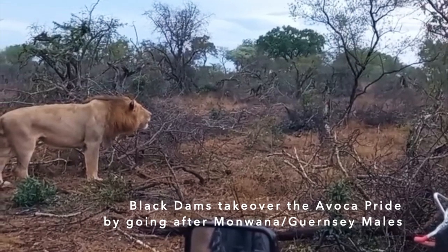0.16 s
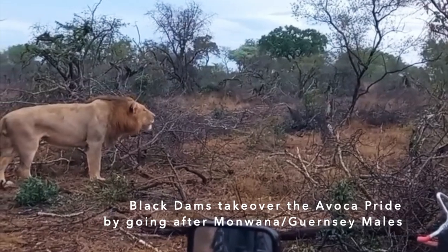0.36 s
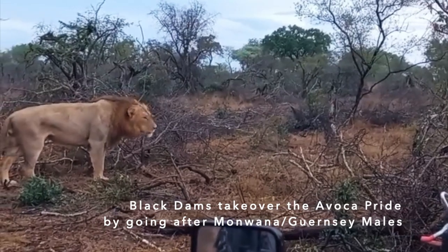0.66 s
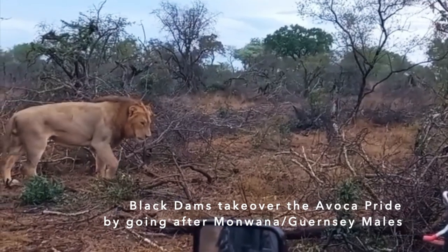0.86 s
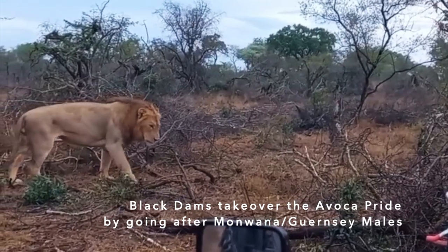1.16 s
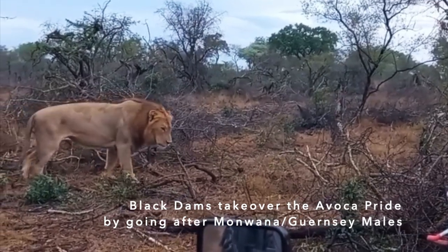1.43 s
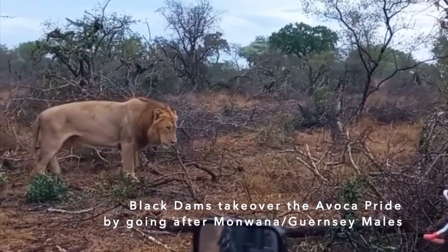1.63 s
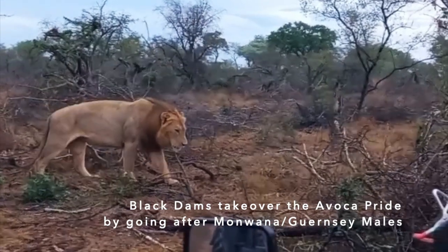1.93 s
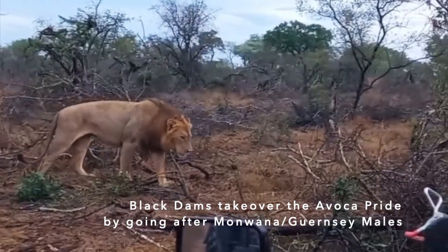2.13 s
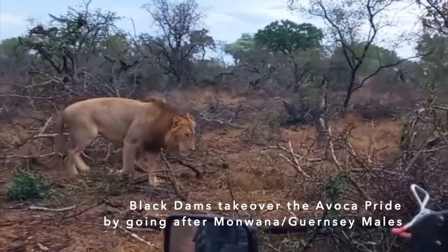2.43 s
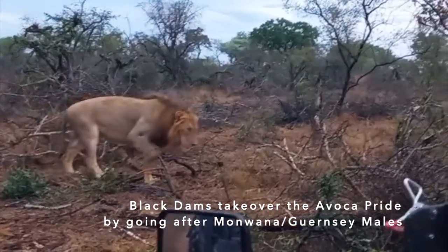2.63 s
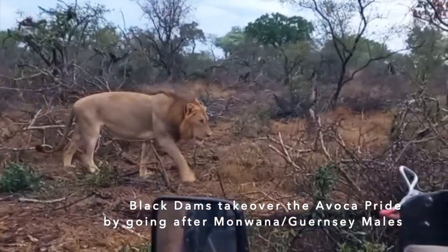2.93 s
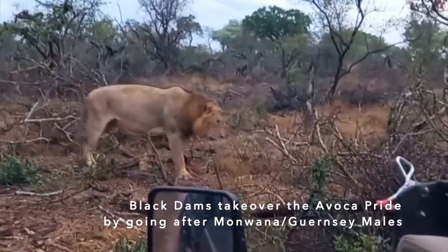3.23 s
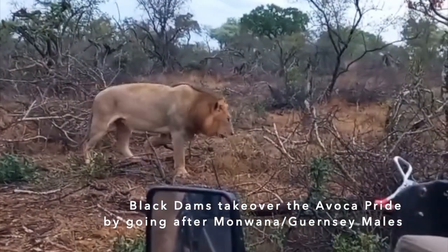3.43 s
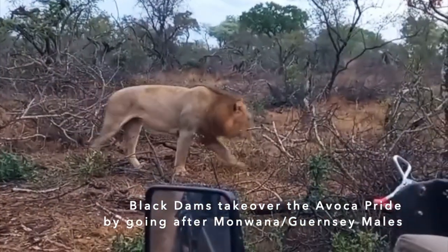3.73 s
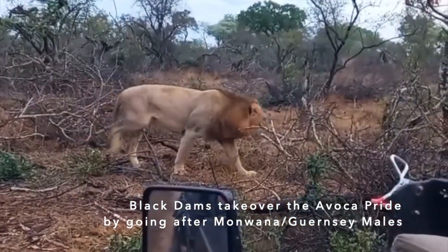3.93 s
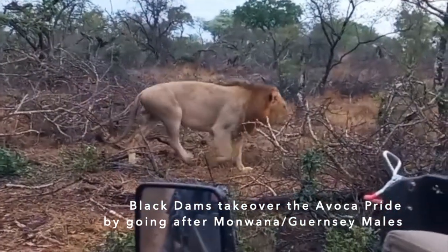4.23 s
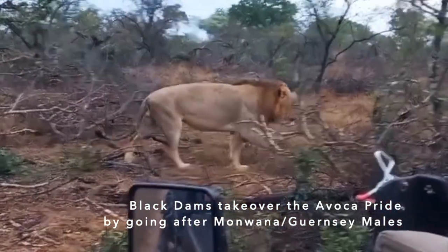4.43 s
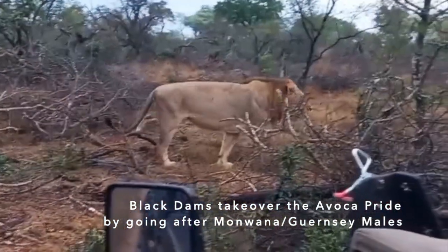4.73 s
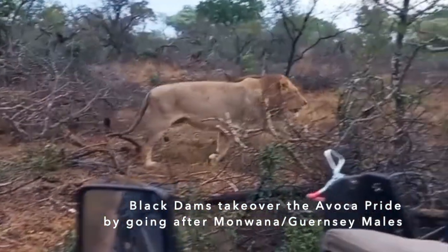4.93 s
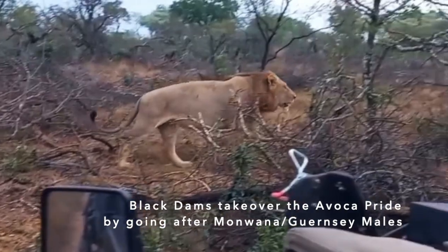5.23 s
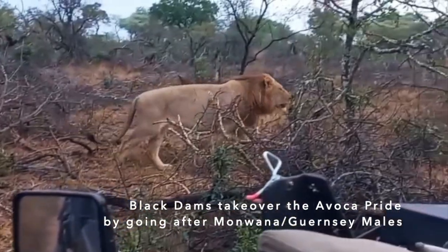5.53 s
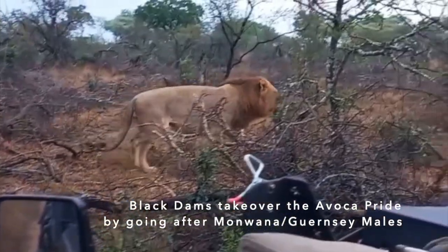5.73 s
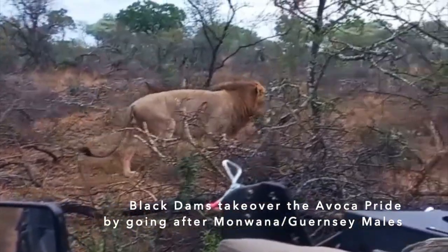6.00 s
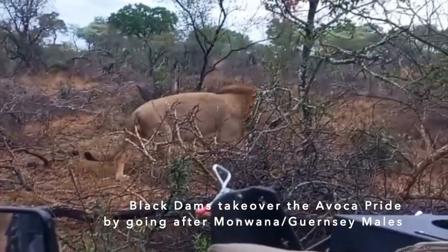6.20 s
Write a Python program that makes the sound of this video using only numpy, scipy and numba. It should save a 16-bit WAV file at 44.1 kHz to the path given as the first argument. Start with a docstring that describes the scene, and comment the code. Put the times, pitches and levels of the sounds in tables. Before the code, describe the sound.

Outdoors in dry bush, big cats give deep chesty roars that sag into rattling growls, then pause to grunts before a second round and a final rising call.

```python
"""Dry bush where lions roar in chorus: long falling roars that break up into deep growls, with softer moans overlapping.
Each voice is a chest tone from the vocal folds plus pulses and turbulence that ring the throat, and in the roars also
the open mouth and teeth. Short hoarse grunts keep up a slow beat. Insects shrill as a fluttering band of noise with
a few single calls, dry twigs crackle in two bursts of tiny snaps, and the thicket scatters the voices over soft air."""
import sys
import numpy as np
from scipy import signal
from scipy.fft import rfft, irfft, next_fast_len
from scipy.io import wavfile
from scipy.ndimage import uniform_filter1d, map_coordinates
from numba import njit

SR = 44100
rng = np.random.default_rng(int(sys.argv[2]) if len(sys.argv) > 2 else 0)


def master_out(mix):
    """Clip the mix to full scale and print it as 16-bit PCM to the path in sys.argv[1]."""
    frames = np.transpose(np.atleast_2d(mix))
    ceiling = np.clip(frames, -1, 1)
    pcm = np.round(ceiling * 32767).astype(np.int16)
    wavfile.write(sys.argv[1], SR, pcm)


N = 280476
TIME = np.arange(N) / SR

# Pitch and effort of each roar. Each row: time in seconds, pitch in Hz, chest tone in dB.
LOUD_FALL = [(-.1, 191.6, -38), (.15, 179.8, -33.5), (.29, 171.7, -18), (.38, 154.7, -16.5),
             (.445, 127, -7.5), (.52, 124.6, -7.5), (.61, 106.6, -11), (.7, 91.3, -26.5), (.77, 98.3, -37)]
SOFT_FALL = [(.62, 262.6, -29.5), (.72, 258.1, -36), (.84, 252.3, -29.5), (.92, 232.2, -27.5),
             (1.04, 215.4, -23), (1.1, 220.4, -39)]
LONG_FALL = [(1.05, 212.7, -39.5), (1.22, 197.7, -35), (1.3, 190.5, -28), (1.38, 167.4, -25.5),
             (1.5, 152.8, -20), (1.64, 146.7, -20), (1.8, 128.8, -19), (1.87, 112, -17.5),
             (1.93, 110.5, -40)]
SHORT_FALL = [(1.83, 200.4, -35.5), (1.92, 190.5, -25), (2.05, 171.9, -24), (2.11, 173.2, -25),
              (2.16, 171.4, -17.5), (2.22, 158.3, -24.5), (2.3, 149.6, -38)]
GROWL = [(2.07, 96, -33), (2.145, 96.2, -12), (2.21, 97.24, -17), (2.3, 93.1, -24.5), (2.35, 97, -34),
         (2.42, 99.5, -31), (2.48, 99.7, -45), (2.55, 96, -50)]
BARK = [(3.69, 99.2, -29.5), (3.76, 101.5, -14), (3.815, 107.9, -8), (3.85, 99.7, -18), (3.89, 95, -20),
        (3.96, 92.2, -34.5)]
SLOW_SWELL = [(3.7, 204.2, -45), (3.92, 212.7, -30.5), (4.04, 212.1, -31), (4.1, 241.5, -22.5),
              (4.17, 223.1, -14.5), (4.29, 213.5, -16.5), (4.35, 206.8, -27.5), (4.41, 192, -48.5)]
HOARSE_FALL = [(4.14, 197, -26), (4.184, 191.2, -20), (4.278, 173.4, -17.5), (4.472, 151.3, -12),
               (4.648, 134.7, -18.5), (4.734, 134.5, -17.5), (4.812, 119.7, -19.5), (4.848, 115.9, -26),
               (4.91, 123.3, -43.5)]
SHORT_RISE = [(3.43, 176.8, -39), (3.53, 189.3, -34.5), (3.62, 201.3, -42), (3.72, 208.3, -48.5)]
RISE_AND_HOLD = [(5.43, 136.5, -41.5), (5.51, 144.1, -24.5), (5.57, 153.4, -21.5), (5.62, 183.3, -22.5),
                 (5.69, 259.3, -34.5), (5.76, 268.7, -28.5), (5.93, 270.4, -31), (6.11, 271.8, -23.5),
                 (6.33, 274.7, -38)]
LAST_RISE = [(6.15, 130.3, -24.5), (6.216, 155, -23.5), (6.292, 212.2, -24.5), (6.31, 216.1, -19.5),
             (6.36, 248.8, -15)]
# The roars; their levels hold at full effort and full jaw. Each row: course (one of the tables above),
# start and end of the wide jaw in seconds, throat overtones in dB, open mouth in dB, gape over mouth in dB,
# rasp in dB (at MIDDLE_HZ), teeth over rasp in dB, upper resonance in Hz, hoarseness from 0 to 1.
CHORUS = [ (LOUD_FALL, 0.12, 0.5, -25.5, -28.5, -3.5, -52, -5.5, 2150, .5),
          (SOFT_FALL, 1.025, 1.3, -45, -54.5, -9.5, -84.5, -4.5, 890, 0.17),
          (LONG_FALL, 0.95, 1.76, -40.5, -48, -22, -58, -3, 1800, 0.54),
          (SHORT_FALL, 1.88, 2.13, -38.5, -53, 2, -47.5, 1.5, 2260, 1),
          (GROWL, 2.13, 2.384, -45, -47.5, -12, -50, -6, 2230, 0.88),
          (SHORT_RISE, 3.52, 3.51, -46, -50.5, -20.5, -59.5, -6, 660, 0.95),
          (BARK, 3.83, 3.834, -29.5, -39, 2.2, -51.5, 2.3, 1200, .7),
          (SLOW_SWELL, 3.96, 4.20, -31, -55.5, -10, -49, -8, 1900, 0.29),
          (HOARSE_FALL, 4.364, 4.605, -35, -50.5, -28.5, -46.5, -2, 2100, 0.83),
          (RISE_AND_HOLD, 5.692, 5.595, -36.5, -48, -18.5, -69, -6.5, 1700, 0.3),
          (LAST_RISE, 6.335, 6.36, -31, -41.5, -15, -43, -7, 1880, 0.94), ]
# The voice rattles when slack, locks clean on its deep notes and breaks again between registers.
# Each row: pitch in Hz, roughness from 0 to 1 before hoarseness and effort.
ROUGHNESS = [(92, .9), (108, 0.6), (125, 0.36), (146, .2), (165, .55), (182, .2), (225, .2), (270, 0)]
# Resonances of the long vocal tract. Each row: centre in Hz, width in Hz, level in dB.
THROAT = [(266.4, 99, 9.5), (457, 160, -6), (590, 98, -11)]
# The larynx is drawn down for low notes, so the mouth resonance sinks with the pitch.
# Each row: pitch in Hz, resonance in Hz.
MOUTH = [(100, 1043), (145, 1059), (220, 1220)]
# Extra resonances with the jaw dropped wide on low notes. Each row: centre in Hz, width in Hz, level in dB.
GAPE = [(784, 140, 2.5), (4600, 740, -18)]
# Upper resonances behind the rasp. Each row: centre in Hz, width in Hz, level in dB.
RASP = [(1350, 250, 1.5), (1757, 370, -1.5), (2145, 410, -3.5), (2650, 660, -13)]
# Turbulence at the teeth. Each row: centre in Hz, width in Hz, level in dB.
TEETH = [(4210, 1100, 5.5), (7020, 1300, -10)]
# Closed-mouth moans. Each row: start, turning point and end in seconds, pitch at each of the three in Hz,
# chest tone in dB and throat overtones in dB at the turning point.
# The first row breaks off before its turning point.
MOANS = [ (-.6, 0.395, 0.36, 269.6, 197, 152, -24.5, -43.5),
         (-.25, .22, .37, 215.1, 194.7, 153.3, -31, -28), (.26, 0.354, .5, 169.2, 166.6, 172, -26, -24.5),
         (1.06, 1.211, 1.46, 230.2, 238.8, 213.6, -32.5, -45),
         (1.601, 1.711, 1.86, 271.8, 276.5, 321, -29.5, -44),
         (3.378, 3.443, 3.52, 204, 246.5, 283, -29.5, -58.5),
         (3.535, 3.634, 3.74, 252.5, 282, 299, -30.5, -59.5),
         (3.856, 4.008, 4.13, 266, 272.7, 283.6, -27, -43), ]
# Grunts. Each row: start in seconds, length in seconds, level in dB.
GRUNTS = [(-.03, .4, -23.5), (.922, .37, -26.5), (1.83, .36, -25), (2.646, .3, -25), (3.428, .36, -24.5),
          (5.126, .28, -27), (5.907, .34, -23)]
# Course of a grunt. Each row: share of its length, share of its pitch, swell around its level in dB.
GRUNT_SHAPE = [(0, 1.04, -24.5), (0.169, 1, -4), (0.418, .94, 1.5), (0.779, .84, -5.5), (1.002, .79, -20.5)]
# Bursts of twigs. Each row: centre in seconds, level in dB, spread in seconds.
TWIGS = [(0.67, -70.5, 0.019), (3.51, -72, 0.22)]
# The insects' shrill band. Each row: centre in Hz, width in Hz, level in dB before scaling to INSECT_DB.
INSECTS = [(3936, 280, -5.5), (4285, 240, -10.5)]
# Single insect calls. Each row: centre in seconds, level in dB.
CHIRPS = [(1.348, -62), (2.76, -63), (6.169, -56)]
# Colour of the air. Each row: frequency in Hz, relative density in dB per Hz.
AIR = [(55, 4.5), (115, 7), (250, -10), (700, -27.5), (6000, -32), (10000, -29.5), (15500, -41.5)]
# Sound thrown back by the thicket. Each row: frequency in Hz, level in dB.
THICKET = [(130, -17), (1000, -11), (2000, -5)]
# Bearing of the lions. Each row: time in seconds, delay of the left microphone port in ms.
BEARING = [(0.4, -0.082), (1.5, 0.12)]
# The recorder turns down the pauses. Each row: level in dB, gain in dB.
HUSH = [(-56.5, -4), (-31.5, 0.5)]

# the jaw's swing
JAW_OPENS_DB_PER_S, JAW_CLOSES_DB_PER_S, JAW_SHUT_DB = 90, 116.5, -26
# share of the jaw's swing, and of the chest tone's swing, that each part of the voice follows
THROAT_JAW, MOUTH_JAW, RASP_JAW = .64, .93, .26
THROAT_EFFORT, MOUTH_EFFORT, RASP_EFFORT = .45, .2, .46
RASP_DB_PER_OCTAVE, MIDDLE_HZ = 8, 150   # the rasp grows as the pitch sinks
ROUGHNESS_PER_DB = .05   # the voice steadies as the effort rises
OVERTONES_BUILD_S, OVERTONES_FADE_S = .11, .07
MOUTH_WIDTH_HZ, MOUTH_TOP_HZ = 280, 1410   # width of each of two passes; top of the mouth band
MOUTH_TURBULENCE = .9   # turbulence's share at a roughness of 1
MOAN_ROUGHNESS, MOAN_SWELL_DB, MOAN_THROAT_SWELL_DB = .15, 17.5, 14.5
GRUNT_HZ, GRUNT_ROUGHNESS = 147.1, .3
GRUNT_THROAT_DB = -30.5   # throat overtones relative to the grunt's level
INSECT_DB, AIR_DB = -57.5, -53
CHIRP_HZ, CHIRP_WIDTH_HZ, CHIRP_S = 4350, 400, .062
# decay times of near and far echoes, far tail relative to near, and where the echoes spread wider
THICKET_T60_S, FAR_T60_S, FAR_DB, ECHO_SPREAD_HZ = .077, .94, -12.5, 3000
LOW_CUT_HZ, CUTOFF_HZ = 83.8, 15700


def roar(rows, wide_from, wide_until, throat_db, mouth_db, gape_db, rasp_db, teeth_db, upper_hz, hoarseness):
    """An open-mouthed roar: the rougher the folds, the more turbulence takes over from their pulses."""
    at, edge, (pitch, chest) = course(rows)
    time = TIME[at]
    effort = chest - chest.max()
    opening = jaw(time, wide_from, wide_until)

    throat = throat_db + THROAT_EFFORT * effort + THROAT_JAW * opening
    mouth = mouth_db + MOUTH_EFFORT * effort + MOUTH_JAW * opening
    deepening = RASP_DB_PER_OCTAVE * np.log2(MIDDLE_HZ / pitch)
    rasp = rasp_db + RASP_EFFORT * effort + RASP_JAW * opening + deepening

    rough = hoarseness * np.interp(pitch, *np.transpose(ROUGHNESS)) - ROUGHNESS_PER_DB * effort
    tone, pulses, air = folds(pitch, rough)
    # the jaw drops furthest on low notes
    gape = np.interp(pitch, [115, 200], [1, .1])
    # the highest overtones are the last to come and the first to go
    build = (time - rows[0][0]) / OVERTONES_BUILD_S
    fade = (rows[-1][0] - time) / OVERTONES_FADE_S
    bright = np.clip(np.minimum(build, fade), 0, 1)

    throat_sound = tract(pulses, air, lambda x: resonate(x, THROAT), .51 * rough)
    mouth_sound = tract(pulses, air, lambda x: mouth_filter(x, pitch), MOUTH_TURBULENCE * rough ** 2)
    gape_sound = tract(pulses, air, lambda x: resonate(x, GAPE), rough)
    rasp_sound = tract(pulses, air, lambda x: rasp_filter(x, upper_hz), .3 + rough)
    teeth_sound = even(resonate(air, TEETH))

    voice = from_db(chest) * tone
    voice = voice + from_db(throat) * throat_sound
    voice = voice + from_db(mouth) * bright * mouth_sound
    voice = voice + from_db(mouth + gape_db) * gape * gape_sound
    voice = voice + from_db(rasp) * bright * rasp_sound
    voice = voice + from_db(rasp + teeth_db) * bright * rough * teeth_sound
    out = np.zeros(N)
    out[at] = edge * voice
    return out


def course(rows):
    """The samples that a call covers, its soft start and end, and its controls at each sample."""
    s, *columns = np.transpose(rows)
    at = np.flatnonzero((TIME >= s[0] - .01) & (TIME <= s[-1] + .01))
    to_nearest_end = np.minimum(TIME[at] - s[0], s[-1] - TIME[at])
    edge = np.clip(to_nearest_end / .02 + .5, 0, 1)   # 20 ms ramps
    return at, edge, [np.interp(TIME[at], s, c) for c in columns]


def jaw(time, wide_from, wide_until):
    """The jaw opens and closes, in dB below fully open; if wide_until comes too soon it never opens fully."""
    opening = JAW_OPENS_DB_PER_S * (time - wide_from)
    closing = JAW_CLOSES_DB_PER_S * (wide_until - time)
    return np.clip(np.minimum(opening, closing), JAW_SHUT_DB, 0)


def folds(pitch, rough, jitter=.08, jitter_hz=90, shimmer=.44, shimmer_hz=75, doubling=.11):
    """Heavy, loose vocal folds: the chest tone, the pulses of their closing, and the air that they chop."""
    size = len(pitch)
    shaken = pitch * (1 + jitter * rough ** 2 * drift(jitter_hz, size))
    phase = 2 * np.pi * np.cumsum(shaken) / SR
    # rough cycles differ in strength and alternate strong and weak
    alternation = 1 + doubling * rough * np.sin(phase / 2)
    swing = np.exp(shimmer * rough * drift(shimmer_hz, size)) * alternation
    pulses = sum(np.cos(k * phase) for k in range(2, 28))
    air = rng.standard_normal(size) * (1.4 + (.5 + .5 * np.cos(phase)) ** 2)
    return even(swing * np.sin(phase)), swing * pulses, swing * air


def tract(pulses, air, cavity, breathy):
    """Pulses and turbulence ring the same cavity; breathy is the turbulence's share of the power."""
    breathy = np.clip(breathy, 0, 1)
    voiced = np.sqrt(1 - breathy) * even(cavity(pulses))
    turbulent = np.sqrt(breathy) * even(cavity(air))
    return even(voiced + turbulent)


def mouth_filter(x, pitch):
    """The moving mouth resonance, applied twice for steep sides; a deep valley lies above it."""
    angle = 2 * np.pi * np.interp(pitch, *np.transpose(MOUTH)) / SR
    r = np.exp(-np.pi * MOUTH_WIDTH_HZ / SR)
    ringing = glide(glide(x, angle, r), angle, r)
    return signal.sosfilt(signal.butter(6, MOUTH_TOP_HZ, fs=SR, output="sos"), ringing)


@njit
def glide(x, angle, r):
    """A two-pole resonance whose centre moves at every sample."""
    y = np.zeros(len(x))
    for i in range(2, len(x)):
        push = (1 - r * r) / 2 * (x[i] - x[i - 2])
        y[i] = push + 2 * r * np.cos(angle[i]) * y[i - 1] - r * r * y[i - 2]
    return y


def rasp_filter(x, upper_hz, width_hz=200, boost_db=3):
    """The upper resonances; the shape of the mouth makes one region stand out."""
    rasp = resonate(x, RASP)
    return rasp + resonate(rasp, [(upper_hz, width_hz, boost_db)])


def moan(rows, rough, breathy):
    """With the mouth nearly shut only chest and throat sound."""
    at, edge, (pitch, chest, throat) = course(rows)
    tone, pulses, air = folds(pitch, rough)
    throat_sound = tract(pulses, air, lambda x: resonate(x, THROAT), breathy)
    out = np.zeros(N)
    out[at] = edge * (from_db(chest) * tone + from_db(throat) * throat_sound)
    return out


def soft_moan(start, turn, end, start_hz, turn_hz, end_hz, chest_db, throat_db):
    """A gliding moan that swells and usually fades."""
    faint = (chest_db - MOAN_SWELL_DB, throat_db - MOAN_THROAT_SWELL_DB)
    rows = [(start, start_hz, *faint), (turn, turn_hz, chest_db, throat_db), (end, end_hz, *faint)]
    return moan(rows, MOAN_ROUGHNESS, breathy=.017)


def grunt(start, length, db):
    """A short hoarse moan that swells and sags."""
    rows = [(start + length * part, GRUNT_HZ * bend, db + swell, db + swell / 2 + GRUNT_THROAT_DB)
            for part, bend, swell in GRUNT_SHAPE]
    return moan(rows, GRUNT_ROUGHNESS, breathy=.097)


def bush(x):
    """Near branches scatter the sound briefly; far trees return a faint, dull tail."""
    t = TIME[:SR]
    near, far = rng.standard_normal((2, 2, SR)) * (t > .004)
    near = rms_one(near * from_db(-60 * t / THICKET_T60_S))
    far = colour(rms_one(far * from_db(-60 * t / FAR_T60_S)), [(150, 6.0), (2000, -13.5)])
    mid, side = (near + from_db(FAR_DB) * far) / np.sqrt(SR)
    # long waves reach the two microphone ports more alike than short ones
    side = signal.lfilter(*signal.butter(1, ECHO_SPREAD_HZ, "high", fs=SR), side) + .99 * side
    echoes = signal.fftconvolve(x[None], [mid + side, mid - side], axes=1)[:, :N]
    return colour(echoes, THICKET) / np.sqrt(2)


def microphones(x):
    """Direct sound reaches one port slightly before the other."""
    delay = np.interp(TIME, *np.transpose(BEARING)) / 1000   # ms to seconds
    return np.array([map_coordinates(x, [(TIME - way * delay / 2) * SR], order=3) for way in (1, -1)])


def insects(pan_db=2.0, flutter_db=1.46):
    """Many insects merge into one narrow, fluttering band, a little to the left; now and then one calls above it."""
    band = rms_one(resonate(rng.standard_normal((2, N)), INSECTS))
    shrill = band * from_db(INSECT_DB + flutter_db * drift(21, N))
    calling = sum(from_db(db) * np.exp(-((TIME - s) / CHIRP_S) ** 2) for s, db in CHIRPS)
    chirp = resonate(rng.standard_normal((2, N)), [(CHIRP_HZ, CHIRP_WIDTH_HZ, 0)])
    return (shrill + calling * rms_one(chirp)) * from_db([[pan_db], [-pan_db]])


def twigs(snaps_per_s=250):
    """Bursts of tiny dry snaps: sparse random clicks under bell-shaped swells."""
    level = sum(from_db(db) * np.exp(-((TIME - s) / length) ** 2) for s, db, length in TWIGS)
    snaps = (rng.random((2, N)) < snaps_per_s / SR) * rng.standard_normal((2, N))
    return level * rms_one(colour(snaps, [(1000, -25.5), (4000, -7.5), (11000, -2.5), (15000, -33.5)]))


def open_air():
    """A soft bed of coloured noise, mostly independent on the two sides."""
    noise = rng.standard_normal(N) + 8.4 * rng.standard_normal((2, N))
    return from_db(AIR_DB) * rms_one(colour(noise, AIR))


def from_db(db):
    """Decibels to gain."""
    return 10 ** (np.asarray(db) / 20)


def rms_one(x):
    """Scale to an rms of 1."""
    return x / np.sqrt(np.mean(x ** 2) + 1e-20)


def drift(rate_hz, size):
    """Smooth random motion with an rms of 1."""
    r = np.exp(-2 * np.pi * rate_hz / SR)
    noise = rng.standard_normal(size + SR // 4)   # a quarter second to settle
    return rms_one(signal.lfilter([1], [1, -2 * r, r * r], noise)[-size:])


def resonate(x, modes):
    """Steep-sided resonances in parallel, with alternating signs."""
    out = 0
    for k, (hz, width, db) in enumerate(modes):
        edges = [max(hz - width / 2, 20), hz + width / 2]
        sos = signal.butter(2, edges, "band", fs=SR, output="sos")
        out = out + (-1) ** k * from_db(db) * signal.sosfilt(sos, x)
    return out


def colour(x, spectrum):
    """Weight a sound by a table of Hz and dB, along a logarithmic frequency scale."""
    hz, db = np.transpose(spectrum)
    size = next_fast_len(x.shape[-1])
    bins = np.fft.rfftfreq(size, 1 / SR) + 1   # 1 Hz up, to avoid log(0)
    gain = from_db(np.interp(np.log(bins), np.log(hz), db))
    return irfft(rfft(x, size) * gain, size)[..., :x.shape[-1]]


def even(x):
    """Hold the loudness steady while harmonics slide through the resonances."""
    power = uniform_filter1d(uniform_filter1d(x * x, SR // 24), SR // 32)
    return x / np.sqrt(np.abs(power) + 1e-20)


def scene():
    """The chorus, its echoes and the bush around it."""
    lions = sum(roar(*row) for row in CHORUS)
    lions = lions + sum(soft_moan(*row) for row in MOANS)
    lions = lions + sum(grunt(*row) for row in GRUNTS)
    heard = (microphones(lions) + bush(lions)) * from_db([[.6], [-.6]])   # slightly left
    return heard + insects() + twigs() + open_air()


def record(dry):
    """The microphone drops the deepest bass, pauses are turned down, the highest peaks are rounded and the top is cut."""
    thin = signal.sosfilt(signal.butter(4, LOW_CUT_HZ, "high", fs=SR, output="sos"), dry)
    power = np.abs(uniform_filter1d(np.mean(thin ** 2, axis=0), SR // 16))
    level = 10 * np.log10(power + 1e-12)
    hushed = thin * from_db(np.interp(level, *np.transpose(HUSH)))
    held = hushed / (1 + hushed ** 8) ** (1 / 8)
    return signal.sosfilt(signal.ellip(10, .1, 90, CUTOFF_HZ, fs=SR, output="sos"), held)


dry = scene()
out = record(dry)
master_out(out)
```